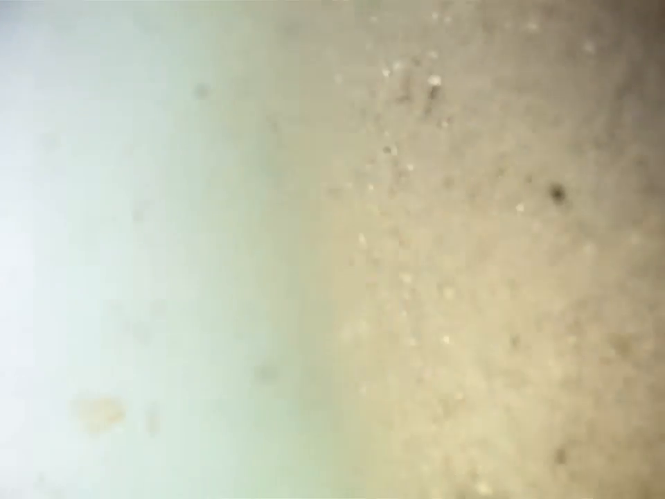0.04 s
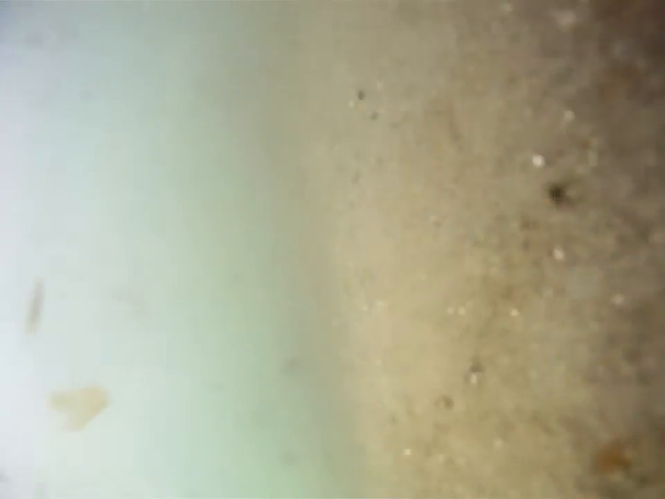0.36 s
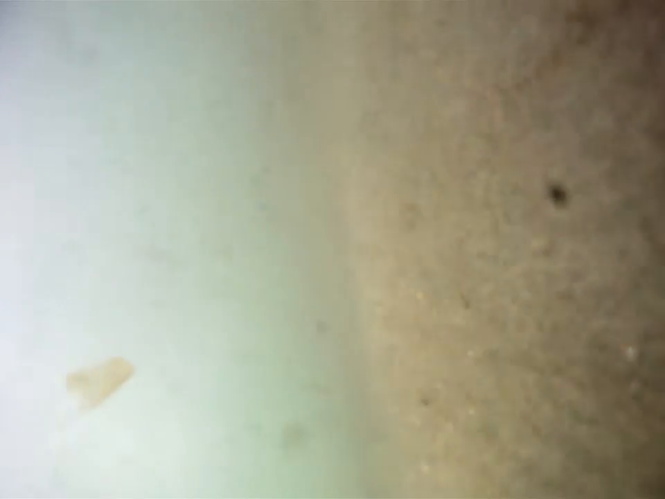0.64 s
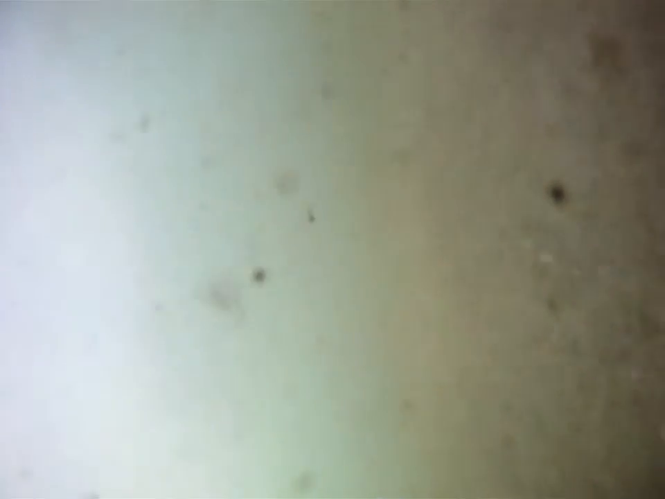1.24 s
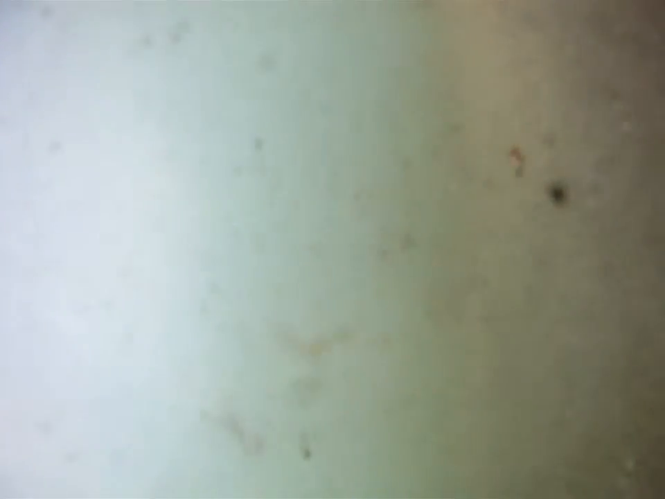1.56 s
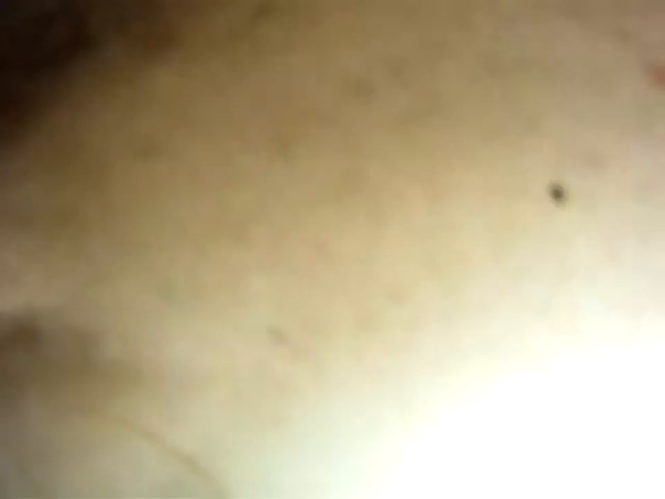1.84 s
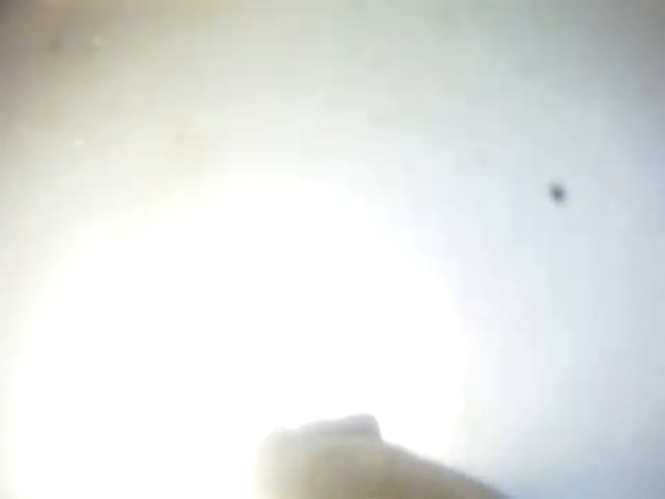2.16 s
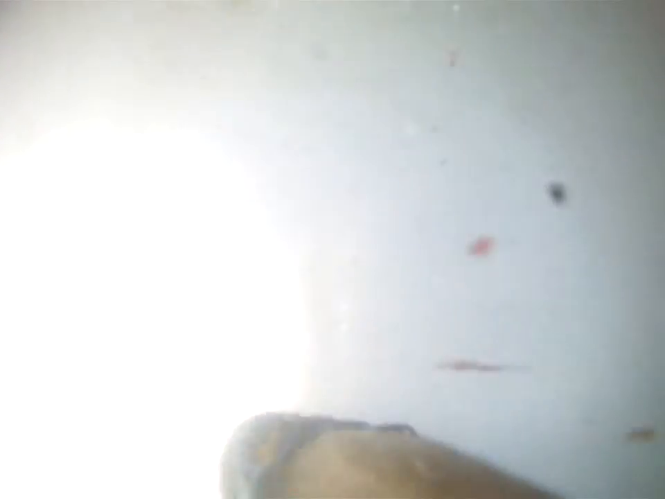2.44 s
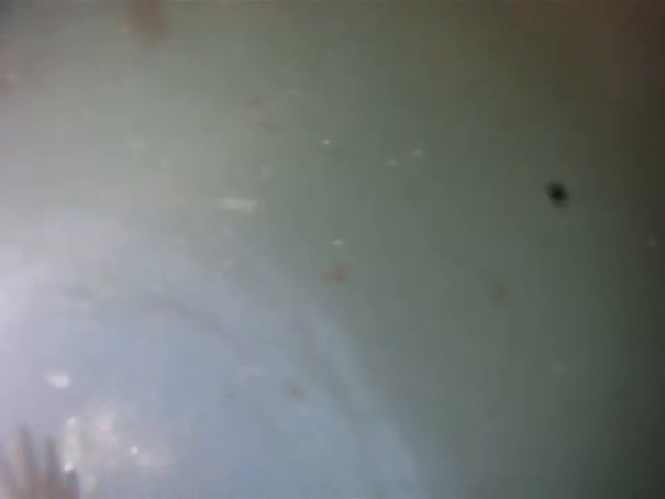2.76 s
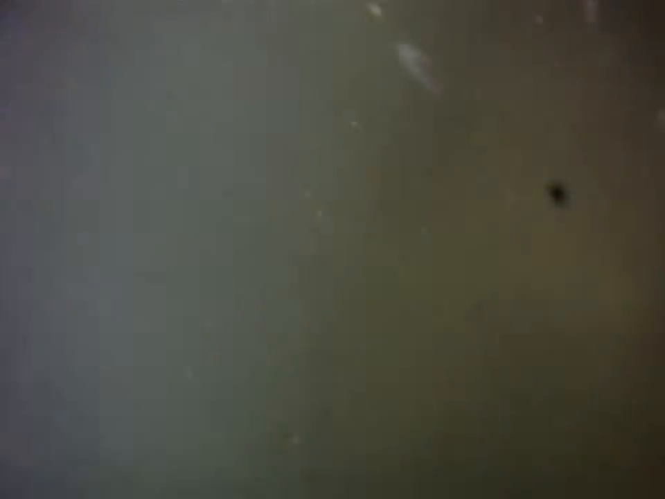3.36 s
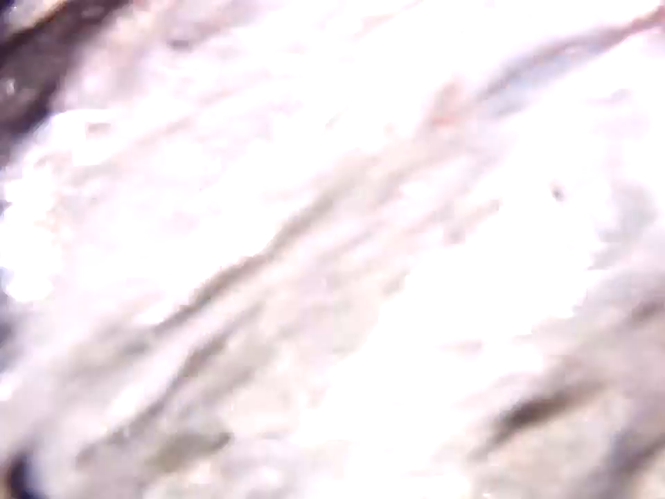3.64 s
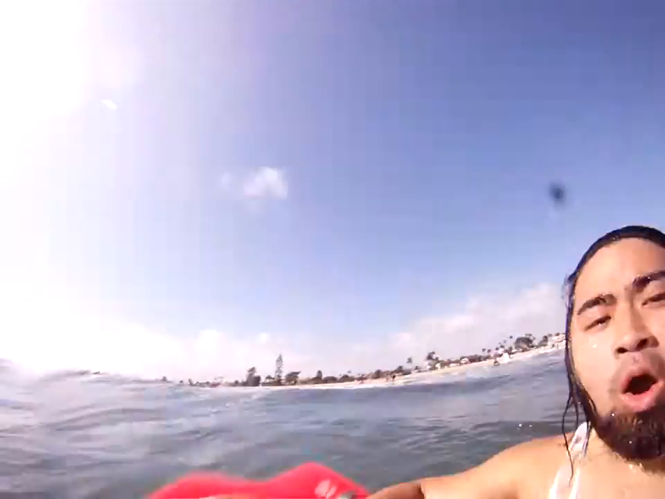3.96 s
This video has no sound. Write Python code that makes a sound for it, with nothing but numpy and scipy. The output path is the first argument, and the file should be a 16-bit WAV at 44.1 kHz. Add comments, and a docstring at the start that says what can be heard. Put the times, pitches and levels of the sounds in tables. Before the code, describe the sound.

Bubbly water rushes over a submerged camera, then slackens amid knocks and thumps.

```python
"""A camera in a waterproof case is held under the surf. Bubbly water rushes over it in surges and
makes it hum hollowly, while eddies rumble and the first knocks and shoves land. A wave churns past,
then the flow slackens to a dull wash with gritty fizz, and harder hits overload the microphone.
Near the end, froth breaks and bubbles plop as the case comes up to the surface."""
import sys
import numpy as np
from scipy import signal
from scipy.fft import rfft, irfft
from scipy.io import wavfile

SR = 44100
rng = np.random.default_rng(int(sys.argv[2]) if len(sys.argv) > 2 else 0)


def generate_wav(sig):
    """Save sig (samples, or channels by samples) to the path in sys.argv[1] as 16-bit PCM at SR."""
    pcm = np.round(np.clip(np.atleast_2d(sig).T, -1, 1) * 32767).astype(np.int16)
    wavfile.write(sys.argv[1], SR, pcm)


N = 176400

# steady flow of water over the case: t/s, level/dB
FLOW_LEVEL = [(0, -26.5), (.13, -30.5), (.34, -28), (.42, -59), (.5, -17), (.535, -29.5), (.57, -22),
              (.79, -23.5), (.9, -21), (1.01, -25), (1.12, -20.5), (1.2, -18), (1.33, -16.5), (1.42, -23.5),
              (1.52, -26.5), (1.6, -25), (1.7, -22), (1.735, -28.5)]
# surges in the flow: start/s, length/s, rush level/dB, hollow note level/dB
FLOW_SURGES = [(0.031, 0.07, -25.5, -21.5), (.152, 0.063, -19, -18.5), (0.227, 0.0084, -19.5, -16),
               (0.355, 0.063, -20.5, -21.5), (0.416, 0.055, -18.5, -19), (0.542, 0.035, -28, -21.5),
               (0.635, 0.056, -22, -26), (0.713, 0.04, -16.5, -19.5), (0.816, 0.026, -20.5, -14.5),
               (0.851, 0.014, -14, -18), (0.881, 0.071, -19, -20), (1.025, 0.059, -24.5, -22.5),
               (1.537, 0.11, -20, -45), (1.61, 0.064, -17, -51)]
# the dull wash after the rush: t/s, level/dB
WASH_LEVEL = [(1.7, -36.5), (1.89, -27.5), (1.915, -40), (1.99, -45.5), (2.04, -30), (2.15, -35),
              (2.2, -23), (2.228, -28.5), (2.34, -27.5), (2.42, -39), (2.49, -42), (2.523, -25.5),
              (2.54, -53), (2.59, -41), (2.68, -23.5), (2.82, -27.5), (2.96, -35.5), (3.02, -37),
              (3.075, -46), (3.15, -26), (3.3, -40), (3.41, -23.5), (3.52, -43), (3.8, -75), (3.87, -38.5),
              (3.96, -25), (4, -28)]
# froth as the case nears the surface: t/s, level/dB
SPLASH_LEVEL = [(3.12, -43), (3.42, -43.5), (3.555, -38), (3.578, -23), (3.63, -19), (3.66, -18.5),
                (3.68, -37), (3.7, -20), (3.745, -36.5), (3.77, -25), (3.8, -38.5), (3.83, -26.5),
                (3.86, -37)]
# tone of water and rattles heard through the case: f/Hz, level/dB
CASE_EQ = [(100, -24.5), (400, -4.5), (720, -8.5), (850, -3), (1000, -7.5), (1150, -10.5), (1350, -3.5),
           (1700, 1), (2000, -3.5), (2200, 3.5), (2600, -4), (2900, -11), (3250, -8.5), (3700, -0.5),
           (3980, -8), (4400, -16), (5300, -14), (6000, -21.5)]
# bright band of sizzle and fizz: f/Hz, level/dB
FIZZ_EQ = [(2000, -26), (3000, -0.5), (3700, 6), (4400, -5), (6000, -9)]
# low band of gurgles and thuds: f/Hz, level/dB
GURGLE_EQ = [(60, -45.5), (150, 2), (280, -0.5), (450, -0.5), (600, 2), (1000, -50)]


def amp(db):
    """Decibels to gain."""
    return 10 ** (np.asarray(db) / 20)


def unit(x):
    """Scales to rms 1."""
    return x / np.sqrt(np.mean(x ** 2) + 1e-20)


def level(curve):
    """Fader ride through (t/s, level/dB) points, dying away fast outside them."""
    s, db = np.transpose(curve)
    t = np.arange(N) / SR
    outside = np.maximum(s[0] - t, 0) + np.maximum(t - s[-1], 0)
    return amp(np.interp(t, s, db) - 1000 * outside)


def swells(rows, attack_s=0.0096, release_s=0.0072):
    """Attack, hold and release envelopes from (start/s, length/s, level/dB) rows."""
    t = np.arange(N) / SR
    gain = np.zeros(N)
    for start, length, db in rows:
        attack = np.clip((t - start) / attack_s, 0, 1)
        release = np.exp(-np.maximum(t - start - length, 0) / release_s)
        gain += amp(db) * attack * release
    return gain


def add(mix, s, sound):
    """Mixes a sound in at time s."""
    part = mix[max(round(s * SR), 0):][:len(sound)]
    part += sound[:len(part)]


def colour(x, points, size=4096):
    """Minimum-phase EQ of unit energy, shaped by (f/Hz, level/dB) points."""
    f, db = np.transpose(points)
    bin_hz = abs(np.fft.fftfreq(size, 1 / SR))
    log_gain = np.log(amp(np.interp(np.log(bin_hz + 1), np.log(f), db)))
    taps = np.fft.ifft(np.exp(np.conj(signal.hilbert(log_gain)))).real[:size // 2]
    return signal.fftconvolve(x, taps / np.linalg.norm(taps))[:len(x)]


def wander(rate_hz):
    """Smooth random motion of rms 1, rolling off around the given rate."""
    f = np.fft.rfftfreq(N, 1 / SR)
    return unit(irfft(rfft(rng.standard_normal(N)) * np.exp(-(f / rate_hz) ** 2), N))


def flutter(rate_hz, depth_db):
    """Randomly flickering gain of rms 1."""
    return unit(amp(depth_db * wander(rate_hz)))


def clicks(rate, spread_db):
    """Random impulses of uneven size, about `rate` a second."""
    hits = rng.random(N) < rate / SR
    polarity = rng.choice([-1, 1], N)
    return hits * polarity * amp(spread_db * np.minimum(rng.exponential(1, N), 3))


def swarm(rate, low_hz, high_hz, cycles, spread_db, rise, count=36):
    """A cloud of small bubbles: damped pings that glide up; `cycles` and `rise` are per decay time."""
    out = np.zeros(N)
    for hz in np.geomspace(low_hz, high_hz, count) * rng.uniform(.96, 1.04, count):
        age = np.arange(0, 6, hz / cycles / SR)  # in decay times
        ping = np.exp(-age) * np.sin(2 * np.pi * cycles * (age + rise * age ** 2 / 2))
        pings = signal.oaconvolve(clicks(rate / count, spread_db), ping)[:N]
        out += np.sqrt(hz) * unit(pings)  # about even power per Hz
    return unit(out)


def flow_strength():
    """Envelope of the steady flow and its surges, summed in power."""
    return np.hypot(level(FLOW_LEVEL), swells(np.array(FLOW_SURGES)[:, :3]))


def rush():
    """Sand grains and bubbles sweep over the case in surges; the passing wave churns and sizzles."""
    # churn and sizzle of the passing wave: t/s, level/dB
    wave_level = [(1.04, -42), (1.1, -30), (1.31, -21.5), (1.45, -25), (1.66, -23), (1.73, -35)]
    # tone of the churning bubbles: f/Hz, level/dB
    churn_eq = [(100, -0.5), (250, -10.5), (530, -1), (720, -10), (950, -6), (1300, 0.5), (1600, -39),
                (3000, 1)]
    grit = unit(clicks(rate=5800, spread_db=-3))
    froth = swarm(rate=1400, low_hz=646, high_hz=5057, cycles=9.4, spread_db=-2, rise=0.022)
    water = unit(colour(grit + amp(-8) * froth, CASE_EQ))
    low_bubbles = swarm(rate=1500, low_hz=210.4, high_hz=1710, cycles=4.9, spread_db=3, rise=0.016)
    churn = unit(colour(low_bubbles, churn_eq))
    sizzle = unit(colour(grit, FIZZ_EQ))
    stream = amp(1) * water * flutter(rate_hz=100, depth_db=0.77) * flow_strength()
    wave = (amp(1.5) * churn + amp(-12) * sizzle) * level(wave_level)
    return stream + wave


def hollow_hum(width_hz=146, pitch_drift=0.025, steadiness=0.16):
    """The flow keeps a low, wandering resonance going around the case; it lingers in slack water."""
    # pitch of the hollow note: t/s, f/Hz
    pitch = [(0, 640), (.09, 512), (.2, 592), (.42, 583), (.7, 602), (1.5, 562), (2.3, 644)]
    # the note in slack water: t/s, level/dB
    slack_level = [(2.28, -45), (2.48, -41), (2.518, -24.5), (2.535, -43.5), (2.62, -35), (2.67, -34.5),
                   (2.74, -39)]
    hz = np.interp(np.arange(N) / SR, *np.transpose(pitch))
    hz *= 1 + pitch_drift * wander(rate_hz=35)
    carrier = np.exp(2j * np.pi * np.cumsum(hz) / SR)
    # noise through two resonators in series that follow the pitch
    pole = np.exp(-np.pi * width_hz / SR)
    ring = signal.lfilter([1], np.poly([pole, pole]), rng.standard_normal(N) / carrier)
    note = (carrier * ring / abs(ring) ** steadiness).real  # evens out the level a little
    surges = swells(np.array(FLOW_SURGES)[:, [0, 1, 3]])
    drive = np.hypot(amp(-7.5) * level(FLOW_LEVEL), surges)
    return unit(note) * (drive + level(slack_level))


def eddies():
    """Pressure eddies rumble against the case, and the moving water gurgles."""
    # eddies buffeting the case: t/s, level/dB
    rumble_level = [(0, -43), (.42, -32.5), (.6, -37), (.8, -39), (.95, -24.5), (1.1, -44), (1.5, -29.5),
                    (1.66, -22.5), (1.74, -27.5), (1.88, -29), (1.95, -11), (1.985, -33), (2.06, -26.5),
                    (2.18, -17), (2.28, -27), (2.48, -25), (2.58, -38), (2.7, -25.5), (3, -22.5),
                    (3.09, -35), (3.24, -18.5), (3.4, -30), (3.53, -17.5), (3.6, -39), (3.78, -56),
                    (3.86, -22), (3.93, -54), (4, -16)]
    # deep tone of the buffeting: f/Hz, level/dB
    rumble_eq = [(10, -11), (25, 2), (50, 5), (100, 0), (170, -20.5), (300, -23.5), (700, -60.5)]
    rumble = unit(colour(rng.standard_normal(N), rumble_eq, size=16384)) * level(rumble_level)
    motion = flow_strength() + amp(2.5) * level(WASH_LEVEL) + level(SPLASH_LEVEL)
    gurgle = unit(colour(clicks(rate=700, spread_db=2.5), GURGLE_EQ)) * motion
    return amp(0.5) * rumble + amp(-11.5) * gurgle


def knocks(attack_s=0.0005):
    """Each knock rings the struck spot and the case's modes, with a brief rattle and a dull thud."""
    # knocks on the case: t/s, level/dB, ring f/Hz, ring decay/s, relative rattle/dB, rattle decay/s
    hits = [(0.3708, -6.5, 626, 0.015, 0, 0.0014), (.5095, 4.5, 2183, 0.0021, -11.5, 0.0056),
            (0.933, -5.5, 1996, 0.0099, -1.5, 0.0022), (1.072, -11, 2060, 0.013, -1.5, 0.0074),
            (1.785, -17.5, 3840, 0.0026, -7.5, 0.0067), (1.8362, -9.5, 3500, 0.0043, -1.5, 0.0012),
            (1.872, -3.5, 2520, 0.0041, -11.5, 0.004), (1.8997, 0, 2044, 0.0033, 2.5, 0.0006),
            (1.944, -15.5, 1500, .003, -2, 0.0017), (2.065, -22, 3550, 0.0023, 3.5, 0.0013),
            (2.209, 16, 2250, .0018, -10.5, 0.0017), (2.2452, 1.5, 710, 0.0038, 8, 0.00032),
            (2.389, 1.5, 450, 0.0027, -5, 0.00059), (2.9807, -0.5, 1500, 0.00023, 4, 0.00068),
            (3.004, -6, 1400, 0.002, -13.5, 0.0045), (3.0494, 3.5, 2015, 0.0018, -12, 0.0011),
            (3.137, -13.5, 563, 0.0036, -33, 0.0039), (3.167, -9.5, 776, 0.0012, -10, 0.0017),
            (3.237, -4.5, 665, 0.00083, -13.5, 0.0021), (3.3963, -1.5, 803, 0.0022, -39, 0.003),
            (3.432, -12.5, 634, 0.0018, -17, 0.0025), (3.836, -5, 936, 0.0051, -11.5, 0.0042),
            (3.84, -2, 1450, 0.002, -26, 0.00051)]
    # case modes that every knock rings: f/Hz, level/dB, decay/s
    case_modes = [(354, -21, 0.0054), (606, -4.5, 0.0017), (841, -11, 0.0046), (1292, -7.5, 0.0023),
                  (1920, -10, 0.0026)]
    t = np.arange(0, .06, 1 / SR)
    rings, rattles = np.zeros((2, N))
    onset = 1 - np.exp(-t / attack_s)
    body = sum(amp(db) * np.exp(-t / decay) * np.sin(2 * np.pi * hz * t) for hz, db, decay in case_modes)
    for s, db, hz, decay, rattle_db, rattle_decay in hits:
        spot = np.exp(-t / decay) * np.sin(2 * np.pi * hz * t)
        rattle = np.exp(-t / rattle_decay) * rng.standard_normal(len(t))
        add(rings, s, amp(db) * onset * (body + spot))
        add(rattles, s, amp(db + rattle_db) * onset * rattle)
    thuds = colour(rattles, GURGLE_EQ)
    return rings + amp(7) * colour(rattles, CASE_EQ) + amp(-3) * thuds


def shoves(swing_s=0.0015):
    """Pressure builds on the case, lets go and swings back: a dull thump."""
    # shoves on the case: centre t/s, level/dB, build and decay time/s
    pushes = [(0.455, -3.5, 0.0074), (.912, -14.5, 0.0099), (1.667, 11, 0.0013), (1.9084, 25.5, 0.0014),
              (2.197, -16, 0.0075), (2.392, 1.5, 0.002), (2.527, -1.5, 0.0051), (2.856, -8, 0.011),
              (2.9764, -0.5, 0.0027), (3.252, -8, 0.01), (3.292, 6, 0.0019), (3.358, -3, 0.0027),
              (3.403, 5.5, 0.0013), (3.433, 0.5, 0.0027), (3.839, 15, 0.0008), (3.969, -8, 0.0065)]
    out = np.zeros(N)
    t = np.arange(-.05, .05, 1 / SR)
    for s, db, decay in pushes:
        thump = np.tanh(t / swing_s) * np.exp(-np.hypot(t, swing_s) / decay)
        add(out, s + t[0], amp(db) * thump)
    return out


def wash():
    """Slack, bubbling water with squirts of fine, bright ticking."""
    # dull tone of the slack water: f/Hz, level/dB
    wash_eq = [(100, 16), (250, 5), (450, -9), (650, 1.5), (870, 4.5), (1120, -6), (1350, -1), (1750, -5.5),
               (2150, 1.5), (2500, -11.5), (2900, -11), (3600, -10), (4500, -18.5), (6000, -26)]
    # squirts of fine fizz: start/s, length/s, level/dB
    squirts = [(1.772, 0.037, -21), (2.092, 0.032, -28.5), (2.14, 0.077, -38), (2.68, 0.13, -39)]
    bubbling = swarm(rate=540, low_hz=407.3, high_hz=3018, cycles=21.7, spread_db=-4.5, rise=0.0525)
    grit = unit(clicks(rate=9800, spread_db=-6))
    body = unit(colour(grit + amp(-12) * bubbling, wash_eq))
    ticks = swarm(rate=450, low_hz=3000, high_hz=5500, cycles=4, spread_db=3.5, rise=0.02)
    fizz = unit(colour(ticks, FIZZ_EQ)) * swells(squirts)
    water = body * flutter(rate_hz=120, depth_db=3.8) * level(WASH_LEVEL)
    return amp(1) * water + amp(-2) * fizz


def bubbles(attack_s=0.0009, rise_per_decay=0.022):
    """Single bubbles pinch off and ring, rising in pitch."""
    # bubbles, from plops to tiny ticks: t/s, level/dB, f/Hz, decay/s
    plops = [(1.8735, -26, 3340, 0.0026), (2.185, -14, 2760, 0.0011), (2.393, -21, 895, 0.011),
             (2.6284, -17.5, 3630, 0.0009), (2.725, -5, 3650, 0.0014), (2.764, -12.5, 5300, 0.0008),
             (2.804, -14, 3260, .0012), (2.998, -11, 2660, 0.0016), (3.329, -26.5, 1186, 0.021),
             (3.469, -26, 5230, 0.0025), (3.486, -18, 1580, 0.0047), (3.541, -8, 2100, 0.0021),
             (3.541, -17, 3800, 0.0018), (3.5709, 7.5, 1356, 0.0028), (3.581, 5, 2060, 0.0022),
             (3.591, -14, 1940, 0.0024), (3.621, -8, 4690, 0.0014), (3.639, 12, 1870, 0.0015),
             (3.713, 12, 1990, 0.0012), (3.731, -13, 3250, 0.003), (3.732, -6, 4950, 0.00091),
             (3.762, -3, 2670, 0.0013), (3.766, -5.5, 1500, 0.0044), (3.769, -4.5, 2280, 0.003),
             (3.779, -6, 2070, .004), (3.785, -14, 5500, 0.0013), (3.793, -15, 1860, 0.0065)]
    out = np.zeros(N)
    for s, db, hz, decay in plops:
        t = np.arange(0, 8 * decay, 1 / SR)
        envelope = (1 - np.exp(-t / attack_s)) * np.exp(-t / decay)
        chirp = np.sin(2 * np.pi * hz * t * (1 + rise_per_decay * t / decay / 2))
        add(out, s, amp(db) * envelope * chirp)
    return out


def splash():
    """Bubbles gather as the case rises, then froth breaks around it."""
    # tone of the breaking froth: f/Hz, level/dB
    splash_eq = [(150, 8), (400, -7), (900, -2.5), (1400, -4.5), (2000, 3), (2900, -12.5), (3600, -5),
                 (4700, -6), (6000, -14)]
    froth = swarm(rate=600, low_hz=602, high_hz=3360, cycles=7.1, spread_db=4.5, rise=0.024)
    spray = unit(clicks(rate=2600, spread_db=-2.5))
    return amp(2.5) * unit(colour(spray + amp(1) * froth, splash_eq)) * level(SPLASH_LEVEL)


def scene():
    """Everything reaches one microphone through the case."""
    water = rush() + hollow_hum() + wash() + splash() + eddies()
    mono = water + knocks() + bubbles() + shoves()
    return np.array([mono, mono])


def record(dry, threshold_db=-9, recover_db_per_s=130, duck_share=0.92, hold_hz=12000, edge_hz=15500):
    """Gain control ducks after hard hits, peaks clip, and slow, held samples add a gritty treble."""
    pole = np.exp(-1 / (0.0031 * SR))  # 3.1 ms smoothing of detector and gain
    power_db = 10 * np.log10(signal.lfilter([1 - pole], [1, -pole], dry[0] ** 2) + 1e-12)
    fall_db = np.arange(N) / SR * recover_db_per_s
    peak_db = np.maximum.accumulate(power_db + fall_db) - fall_db
    over_db = np.maximum(peak_db - threshold_db, 0)
    ducked = dry * amp(-duck_share * signal.lfilter([1 - pole], [1, -pole], over_db))
    clipped = np.clip(signal.resample_poly(ducked, hold_hz, SR, axis=1), -1, 1)
    # holding each sample mirrors the spectrum into the treble
    steps = np.repeat(clipped, 8, axis=1)
    held = signal.resample_poly(steps, SR, 8 * hold_hz, axis=1)[:, :N]
    lowpass = signal.firwin(401, edge_hz, window=("kaiser", 8), fs=SR)
    return signal.oaconvolve(held, lowpass[None], "same")


dry = scene()
out = record(dry)
generate_wav(out)
```